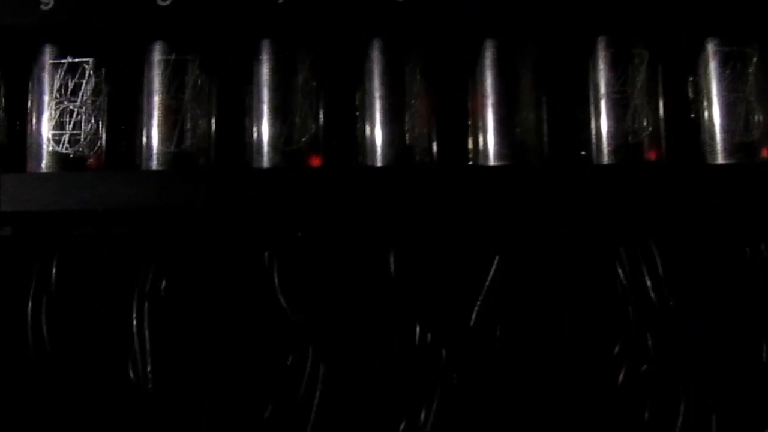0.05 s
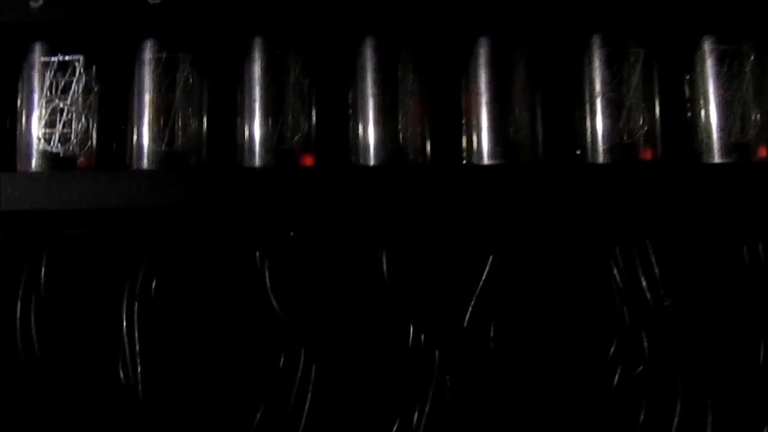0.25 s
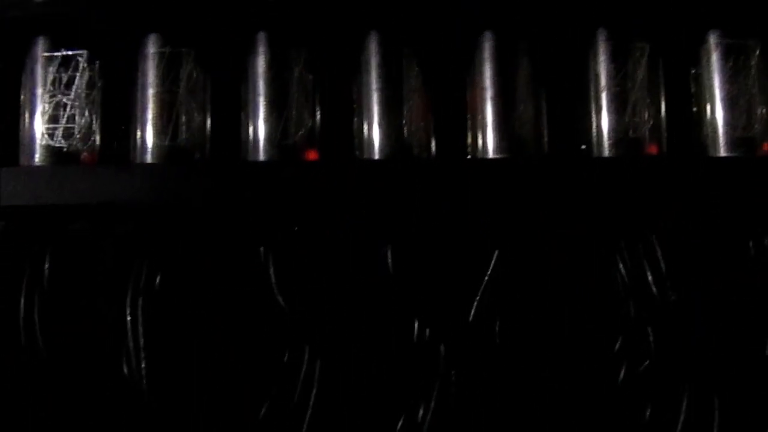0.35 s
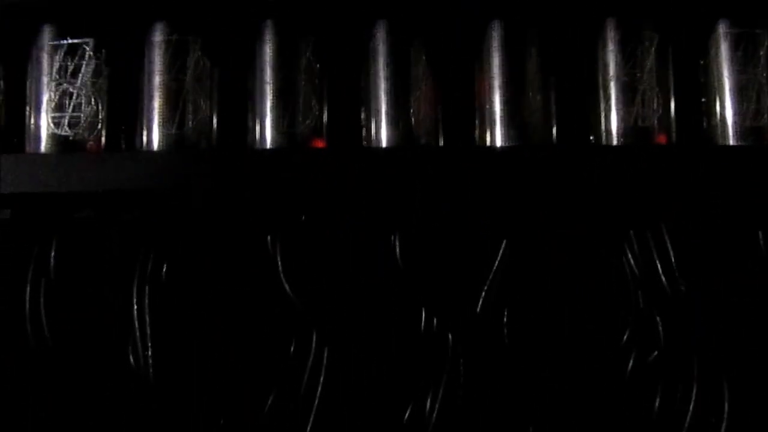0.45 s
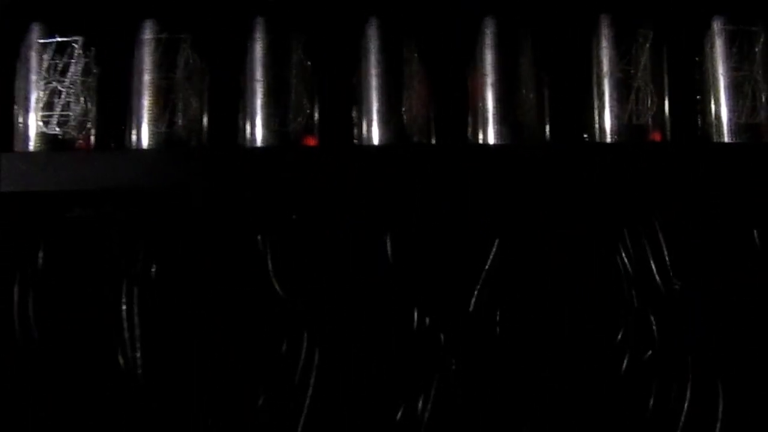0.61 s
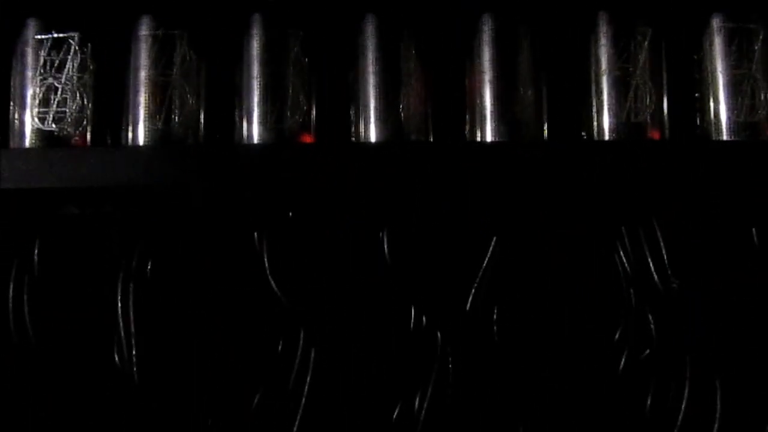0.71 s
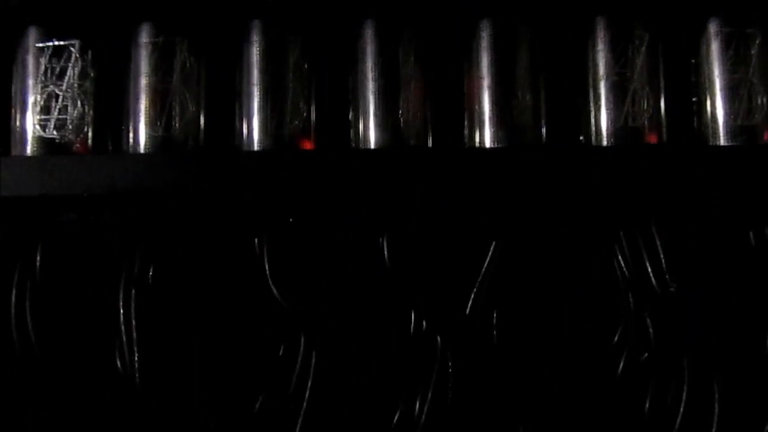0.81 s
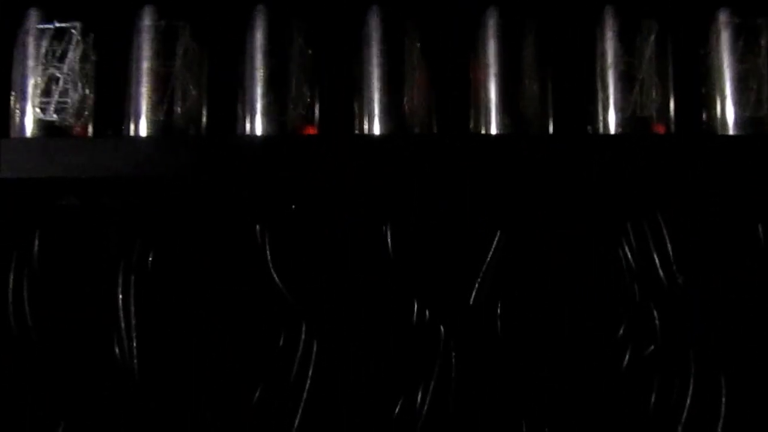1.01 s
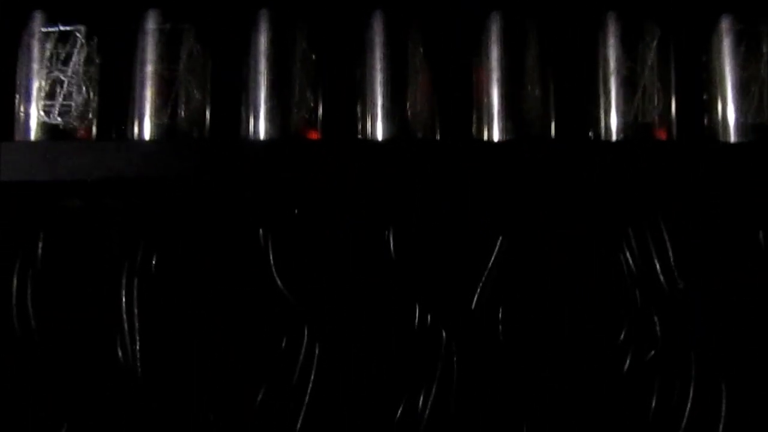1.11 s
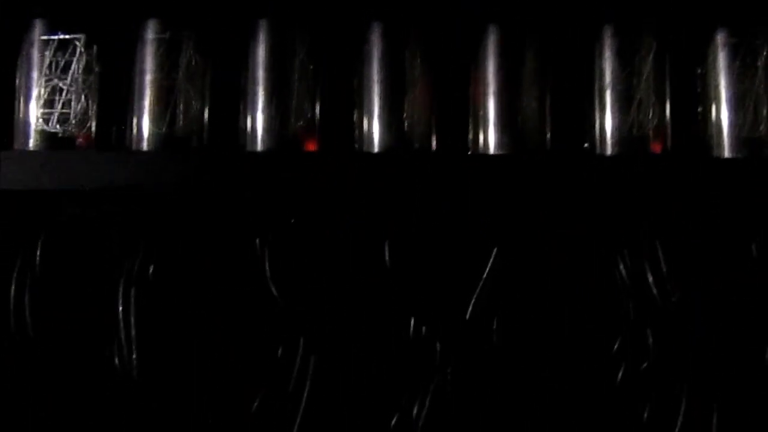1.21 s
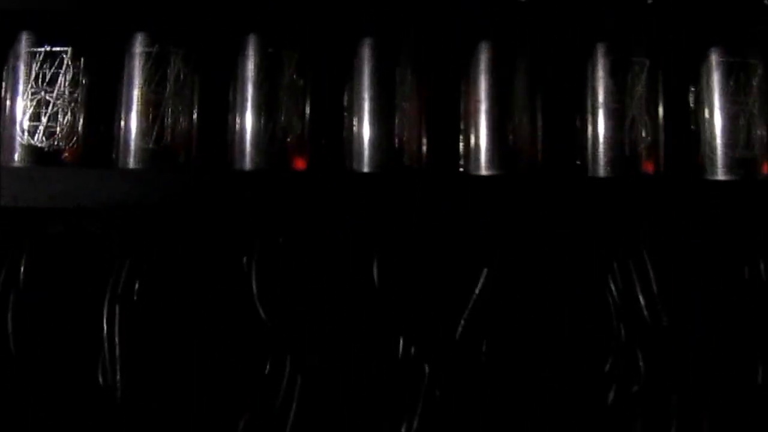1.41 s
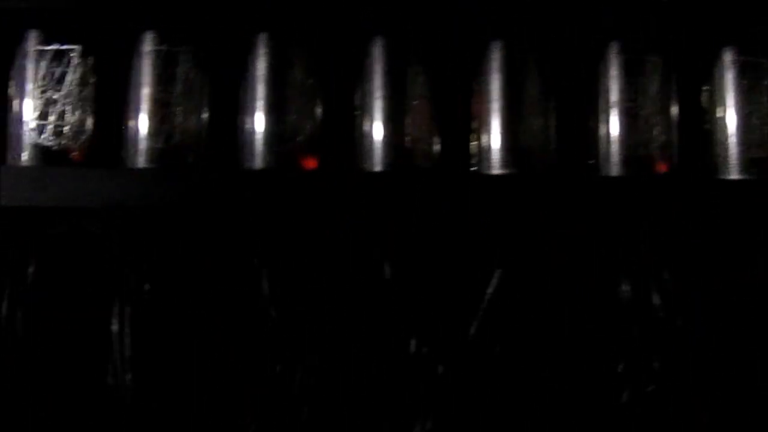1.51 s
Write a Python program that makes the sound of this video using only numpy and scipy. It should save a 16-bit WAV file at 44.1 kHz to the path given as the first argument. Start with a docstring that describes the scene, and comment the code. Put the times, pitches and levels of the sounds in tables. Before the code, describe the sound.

Close mechanical clicks of old calculator keys and a switch, one heavy clunk shaking the bench

```python
"""A knock is dying away over quiet hiss as keys and switches of an old electronic calculator are worked on a bench.
Close to the microphone a stiff switch scrapes along and bangs home, shaking the bench; later a contact snaps and
its key hits the stop, with light knocks and thin metal ticks in between, in a small room.
Knocks, snaps and the room tail are shaped noise bands, knocks and bench also ringing modes; scrapes are crowds
of tiny slips, ticks are noise bursts through metal resonances, and the hiss is slowly wavering noise."""
import sys
import numpy as np
from scipy import signal
from scipy.fft import rfft, irfft, next_fast_len
from scipy.io import wavfile

SR = 44100
rng = np.random.default_rng(int(sys.argv[2]) if len(sys.argv) > 2 else 0)


def inscribe(sig):
    """Save sig as 16-bit PCM at rate SR to the path in sys.argv[1].

    A 1-D sig is mono; a 2-D sig holds one channel per row.
    Samples are clipped to [-1, 1] before scaling.
    """
    pcm = np.round(np.clip(np.atleast_2d(sig).T, -1, 1) * 32767)
    wavfile.write(sys.argv[1], SR, pcm.astype(np.int16))


N = 68355
BANDS = 25 * 2 ** (np.arange(29) / 3)  # third-octave centres [Hz]
HIT_SIZE = 16384  # samples in each single sound
AGE = np.arange(HIT_SIZE) / SR  # time since its start [s]
LEVEL_S = .015  # a short sound's level is its energy spread over this time
PORT_LAG_S = .00011  # the right side hears later than the left
KNOCK_ALIKE_HZ, ALIKE_BELOW_HZ, ROOM_ALIKE_HZ = 1910, 2200, 370  # the two sides grow alike below these


def undb(db):
    """Decibels to gain."""
    return 10 ** (np.asarray(db) / 20)


def decay(t60):
    """Exponential fall by 60 dB in t60 seconds."""
    return np.exp(-np.log(1000) * AGE / t60)


def add(out, at, x):
    """Mix a sound in from a given time [s]."""
    i = int(at * SR)
    out[:, i:i + x.shape[1]] += x[:, :N - i]


def strike_level(x, db):
    """Give a short sound the energy of LEVEL_S seconds at this level."""
    return x * undb(db) / np.sqrt(np.sum(x ** 2) / (2 * LEVEL_S * SR))


def pan(db):
    """Gains that set the left above the right by this many dB."""
    return undb(np.array([[db], [-db]]) / 2)


def colour(points):
    """Band gains drawn through (frequency [Hz], level [dB]) points."""
    hz, db = np.array(points, float).T
    return undb(np.interp(np.log(BANDS), np.log(hz), db))


def hump(hz, low_fall, high_fall):
    """Band gains that fall away below and above a centre [dB/octave]."""
    octaves = np.log2(BANDS / hz)
    return undb(np.minimum(low_fall * octaves, -high_fall * octaves))


def band_noise(size, alike_hz):
    """Third-octave stereo noises of rms 1, the two sides growing alike below alike_hz."""
    hz = np.arange(size // 2 + 1) * SR / size + 1
    mid, side = rfft(rng.standard_normal((2, size)))
    alike = 1 / (1 + (hz / alike_hz) ** 3)
    both = mid * np.sqrt(1 + alike) + side * np.sqrt(1 - alike) * np.array([[1], [-1]])
    both[1] *= np.exp(-2j * np.pi * hz * PORT_LAG_S)
    # triangular windows on a logarithmic frequency scale
    distance = np.abs(np.log(hz / BANDS[:, None])) / np.log(BANDS[1] / BANDS[0])
    windows = np.maximum(1 - distance, 0)
    x = irfft(windows[:, None] * both, size)
    return x / x.std(axis=(1, 2), keepdims=True)


def crack(gains, t60, alike_hz):
    """The crowd of damped modes a blow starts, as noise bands; high ones start and die sooner (t60 is at 1 kHz)."""
    rise_s, rise_cycles, treble_damp = 0.000067, 0.4, 0.19
    hz = BANDS[:, None, None]
    attack = -np.expm1(-AGE / (rise_s + rise_cycles / hz))
    fall = decay(t60 / (hz / 1000) ** treble_damp)
    bands = band_noise(HIT_SIZE, alike_hz) * attack * fall
    return strike_level(np.tensordot(gains / bands.std(axis=(1, 2)), bands, 1), 0)


def ring(modes, gains=None, spread=1):
    """Decaying sine modes, slightly detuned at each blow; high ones reach the two sides out of step."""
    out = 0
    for hz, db, t60 in modes:
        detune, skew = rng.standard_normal(2)
        weight = 1 if gains is None else np.interp(hz, BANDS, gains)
        side_skew = spread * skew * min((hz / KNOCK_ALIKE_HZ) ** 2, 2)
        side_phase = (side_skew + 2 * np.pi * hz * PORT_LAG_S) * np.array([[.5], [-.5]])
        start = rng.uniform(0, 2 * np.pi) * spread
        wave = np.sin(2 * np.pi * hz * (1 + .002 * detune) * AGE + side_phase + start)
        attack = -np.expm1(-AGE * hz)
        out = out + weight * undb(db) * wave * decay(t60) * attack
    return strike_level(out, 0)


def resonate(x, peaks):
    """Pass a sound through the broad resonances of a small metal part, each filtered twice."""
    out = 0
    for hz, width, db in peaks:
        b, a = signal.iirpeak(hz, hz / width, fs=SR)
        once = signal.lfilter(b, a, x)
        out = out + undb(db) * signal.lfilter(b, a, once)
    return strike_level(out, 0)


def chatter(t60):
    """Metal chattering against metal: a noise burst that dies away."""
    return rng.standard_normal((2, HIT_SIZE)) * decay(t60) + 1e-18  # the offset avoids vanishing numbers


def knocks():
    """Keys and sliders hit their stops: a damped note at the part's own pitch, a crack, and the ring of the case."""
    # parts hitting the case: (time [s], level [dB], centre [Hz], fall below it [dB/octave],
    # fall above it [dB/octave], t60 of the crack [s], case ring against the crack [dB])
    stops = [(0.1395, -40.5, 1172, 7, 15.5, 0.065, -32), (0.1515, -44, 735, 11, 2.5, 0.15, -13),
             (0.1894, -37.5, 441, 22.5, 1.5, 0.063, -24), (0.2055, -37, 606, 7, 24, 0.017, -23),
             (0.2180, -37, 570, 8, 5.5, 0.16, -1), (0.233, -37.5, 555, 12.5, 13.5, 0.068, -11),
             (0.245, -34.5, 586, 9.5, 3, 0.18, -19), (0.2673, -20, 575, 22, 5, 0.13, -9.5),
             (0.2727, -27, 609, 11, 10, 0.047, -12), (0.2775, -30.5, 1093, 18.5, 10.5, 0.073, -1.5),
             (0.3094, -42.5, 766, 3.5, 8, 0.045, -28), (0.324, -46.5, 288, 8, 14, .12, -33),
             (0.385, -45.5, 266, 13, 4.5, 0.11, -12), (0.5088, -43.5, 1282, 8, 13.5, 0.11, -7),
             (0.5674, -43.5, 470, 13, 5, 0.064, 1.5), (0.9314, -27.5, 1790, 7.5, 7, 0.1, -16),
             (0.9472, -30.5, 1280, 5, 4, 0.15, 1.5), (0.9493, -26, 1198, 11, 9.5, 0.059, -4),
             (0.9505, -28.5, 676, 19, 3.5, 0.071, 0), (1.2649, -50.5, 1555, 4, 10, 0.11, -18),
             (1.3305, -51.5, 1180, 0.5, 31, 0.068, 15), (1.376, -43.5, 749, 9, 7.5, 0.056, -6),
             (1.5420, -55.5, 530, 6, 2, 0.037, -16)]
    # modes of the case: (frequency before detuning [Hz], level before the blow's colour [dB], t60 [s])
    case_modes = [(441, -2, .15), (460, -7, .11), (581, -9, .15), (622, -2, .09), (672, 1, .1),
                  (786, -7, .12), (884, -7, .13), (947, -5, .1), (1001, -6, .1), (1114, -1, .13),
                  (1215, -4, .08), (1320, -1, .09), (1485, -13, .33), (1720, -9, .12)]
    # a small part left ringing: (frequency before detuning [Hz], relative level [dB], t60 [s])
    ping_modes = [(2190, -0.57, 0.15), (2080, -1.7, 0.096)]
    note_db, note_t60_s = -3, 0.043
    note_fall = 18.74  # summed falls [dB/octave] that give note_db; steeper falls make a clearer note
    rise_s = .001
    out = np.zeros((2, N))
    for at, db, hz, low_fall, high_fall, t60, ring_db in stops:
        gains = hump(hz, low_fall, high_fall)
        clearness = ((low_fall + high_fall) / note_fall) ** 2
        note = undb(note_db) * clearness * ring([(hz, 0, note_t60_s)])
        case = undb(ring_db) * ring(case_modes, gains)
        blow = note + crack(gains, t60, KNOCK_ALIKE_HZ) + case
        add(out, at, strike_level(blow * -np.expm1(-AGE / rise_s), db))
    add(out, .573, undb(-50.5) * ring(ping_modes))
    # an earlier knock dying away
    add(out, 0, undb(-49.5) * crack(hump(600, 3.2, 5.1), .16, KNOCK_ALIKE_HZ))
    return out


def snaps():
    """A contact spring flips over with a bright crack, and its resonances buzz briefly."""
    # springs letting go: (time [s], level of the crack before panning [dB], t60 at 1 kHz [s],
    # left over right [dB], spring buzz against the crack [dB], tilt [dB/octave])
    releases = [(0.137, -53, 0.12, 14.5, -14, -3), (0.1935, -53, 0.012, 2, -5, 1),
                (0.5625, -53.5, 0.06, 10, -9.5, -1.5), (0.9279, -62, 0.0092, -8, -13, 10),
                (0.9304, -37.5, 0.033, 9.5, -2.5, 0.5), (0.9500, -39.5, 0.021, 7, -4, -1.5),
                (1.3167, -56, 0.037, 7, 0, 0)]
    # colour of a snap before its tilt: (frequency [Hz], level per band [dB])
    snap_colour = [(500, -19), (1500, 6.5), (2700, -15), (4200, 6.5), (6000, -21), (7200, 2), (8700, -2.5),
                   (10500, -7.5), (13000, 1), (16000, -1)]
    # resonances of the spring: (frequency [Hz], width of one filter pass [Hz], level [dB])
    spring_peaks = [(4250, 300, -10), (5820, 430, 0), (6920, 250, -10)]
    out = np.zeros((2, N))
    for at, db, t60, pan_db, buzz_db, tilt in releases:
        gains = colour(snap_colour) * undb(tilt * np.log2(BANDS / 1000))
        buzz = undb(buzz_db) * resonate(chatter(.075), spring_peaks)
        add(out, at, undb(db) * pan(pan_db) * (crack(gains, t60, ALIKE_BELOW_HZ) + buzz))
    return out


def scrapes():
    """Sliding parts catch and slip in tiny random steps, swelling or easing over the stroke."""
    # strokes: (start [s], end [s], noise level before stroke shape and panning [dB], rise over the stroke [dB],
    # release time constant [s], centre [Hz], left over right [dB])
    strokes = [(0.192, 0.266, -42.5, 0, 0.021, 1430, 3), (0.25, 0.274, -35.5, 0.5, 0.0027, 2000, -2),
               (0.291, 0.326, -51.5, -6, 0.015, 1800, 0), (0.502, 0.554, -61, -1.5, .01, 5460, 3),
               (0.669, 0.689, -50.5, -5, 0.018, 4670, 0), (1.318, 1.366, -49, 3.5, 0.015, 5800, 4),
               (1.362, 1.373, -43, -4, 0.01, 4200, 4.5)]
    slips_per_s, rough_db, slip_s = 800, 2, .003
    low_fall, high_fall = 3.66, 3.6  # [dB/octave]
    out = np.zeros((2, N))
    for start, end, db, rise_db, release, hz, pan_db in strokes:
        length = end - start
        swell = undb(rise_db * np.minimum(AGE / length - 1, 0))
        stroke = swell * np.exp(-np.maximum(AGE - length, 0) / release)
        sizes = undb(rough_db * rng.standard_normal(HIT_SIZE))
        slips = (rng.random(HIT_SIZE) < slips_per_s / SR) * sizes
        # the energy of each slip fades over slip_s
        grip = np.sqrt(signal.lfilter([1], [1, -np.exp(-1 / (slip_s * SR))], slips ** 2))
        noise = np.tensordot(hump(hz, low_fall, high_fall), band_noise(HIT_SIZE, ALIKE_BELOW_HZ), 1)
        rub = grip * noise
        add(out, start, undb(db) * pan(pan_db) * stroke * rub / rub.std())
    return out


def ticks():
    """A latch ticks on the left, very high and short, rattles a moment and is thrown back by the bench."""
    # ticks: (time [s], level before panning [dB], t60 of the noise burst [s], left over right [dB],
    # rattle against the tick [dB])
    latch_ticks = [(0.1633, -46.5, .007, 7.5, -3), (0.6687, -44, 0.0018, 8.5, -5),
                   (1.3312, -46.5, 0.0077, 11, -3)]
    # resonances of the latch: (frequency [Hz], width of one filter pass [Hz], level [dB])
    latch_peaks = [(5600, 500, -7.5), (8440, 3100, -10), (11600, 1240, 2), (13600, 1300, -18)]
    rattle_t60_s, rattle_pan_db = 0.078, 8
    echo_s, echo_db, echo_pan_db = .0038, -11, -1
    out = np.zeros((2, N))
    for at, db, t60, pan_db, rattle_db in latch_ticks:
        tick = undb(db) * resonate(chatter(t60), latch_peaks)
        rattle = undb(db + rattle_db) * resonate(chatter(rattle_t60_s), latch_peaks)
        add(out, at, pan(pan_db) * tick + pan(rattle_pan_db) * rattle)
        add(out, at + echo_s, undb(echo_db) * pan(echo_pan_db) * tick)
    return out


def bench():
    """Jolts make the bench boom, towards the right: a low decaying mode and one overtone for each."""
    # jolts: (time [s], level before panning [dB], pitch before slight detuning [Hz], t60 [s],
    # overtone against the low mode [dB])
    jolts = [(0.2253, -37, 89.2, 0.25, -13), (0.2655, -28.5, 94.4, 0.076, -2.5),
             (0.2872, -27.5, 95.5, 0.063, -14), (0.35, -43, 78, 0.39, -27),
             (0.6700, -54.5, 108, 0.095, -10)]
    out = np.zeros((2, N))
    for at, db, hz, t60, overtone_db in jolts:
        modes = [(hz, 0, t60), (hz * 1.6, overtone_db, t60)]
        add(out, at, undb(db) * ring(modes, spread=0))
    return out * pan(-5)


def room(x):
    """A short diffuse tail from the walls: the direct sound convolved with decaying noise."""
    # colour of the tail before a 3 dB/octave lift: (frequency [Hz], level per band [dB])
    wall_colour = [(100, 14), (500, 4.5), (1500, -1.5), (5000, 9.5), (11000, 7), (16000, -5)]
    room_db, t60_s, gap_s = -15.5, 0.25, 0.007
    tail = np.tensordot(colour(wall_colour) * np.sqrt(BANDS), band_noise(HIT_SIZE, ROOM_ALIKE_HZ), 1)
    fade_in = np.clip(AGE / gap_s - .5, 0, 1)  # from half the gap to one and a half
    tail = tail * decay(t60_s) * fade_in
    tail = tail / np.sqrt(np.sum(tail ** 2) / 2)
    return undb(room_db) * signal.fftconvolve(x.mean(axis=0)[None], tail, axes=1)[:, :N]


def hiss():
    """Quiet room air and microphone hiss: noise bands that each waver a little."""
    # colour of the hiss: (frequency [Hz], relative level per band [dB])
    hiss_colour = [(25, -6.5), (60, 2.5), (110, 2), (250, -1), (600, 5), (1200, 2.5), (2500, -2), (4000, 0),
                   (6000, 3.5), (10000, -1.5), (15000, 1)]
    hiss_db, waver_db = -56, 0.5
    knots = rng.standard_normal((len(BANDS), 20))
    places = np.linspace(0, 19, N)
    waver = np.array([np.interp(places, np.arange(20), k) for k in knots])
    bands = band_noise(next_fast_len(N), ROOM_ALIKE_HZ)[..., :N]
    x = np.tensordot(colour(hiss_colour), bands * undb(waver_db * waver)[:, None], 1)
    return undb(hiss_db) * x / x.std()


def scene():
    """The calculator on its bench, close to the microphone, with the room behind it."""
    direct = knocks() + snaps() + scrapes() + ticks() + bench()
    return direct + room(direct) + hiss()


def record(dry):
    """The recorder cuts the top above 16 kHz with a steep low-pass."""
    return signal.sosfilt(signal.ellip(8, .2, 70, 16000, fs=SR, output="sos"), dry)


dry = scene()
out = record(dry)
inscribe(out)
```